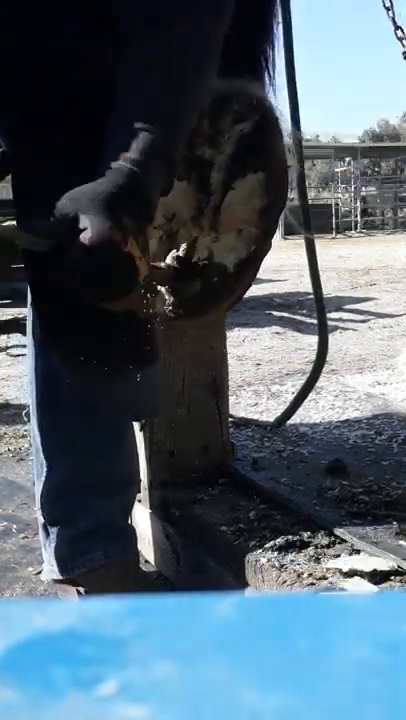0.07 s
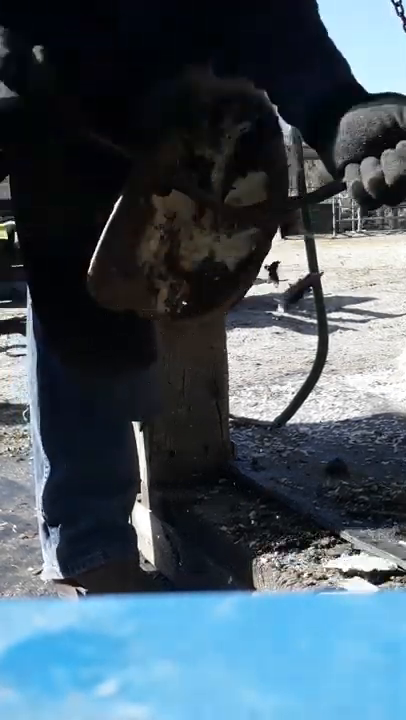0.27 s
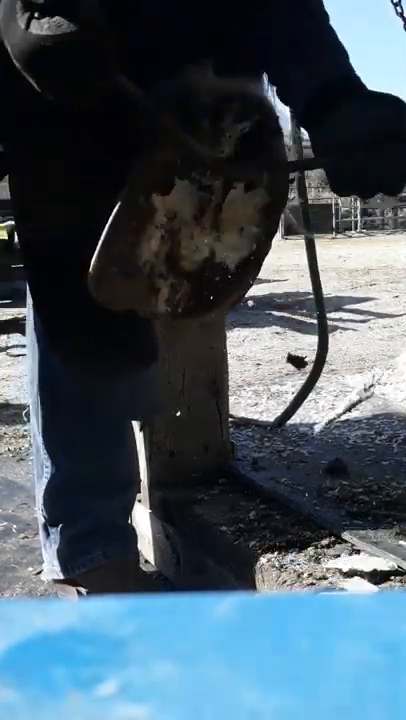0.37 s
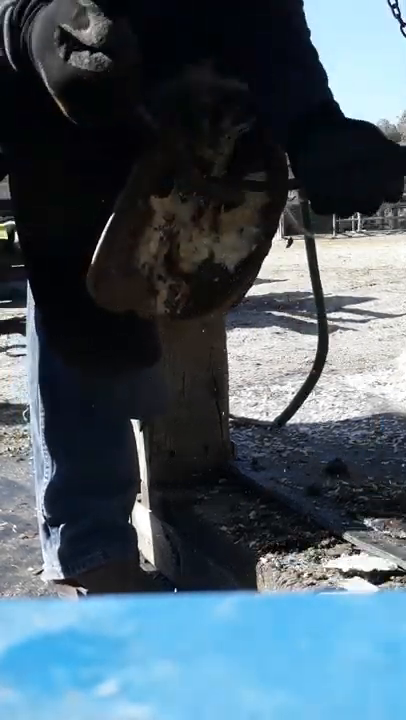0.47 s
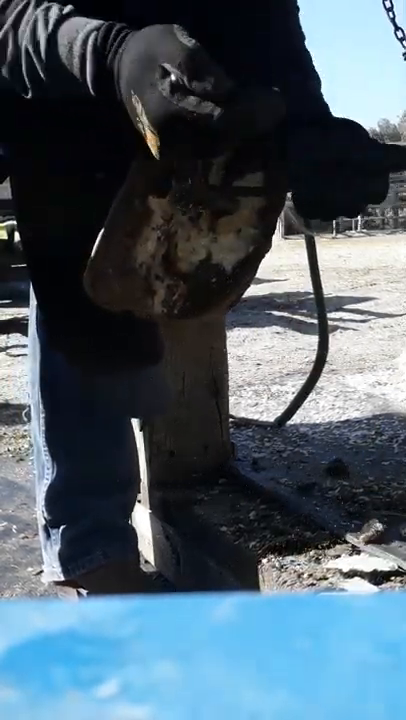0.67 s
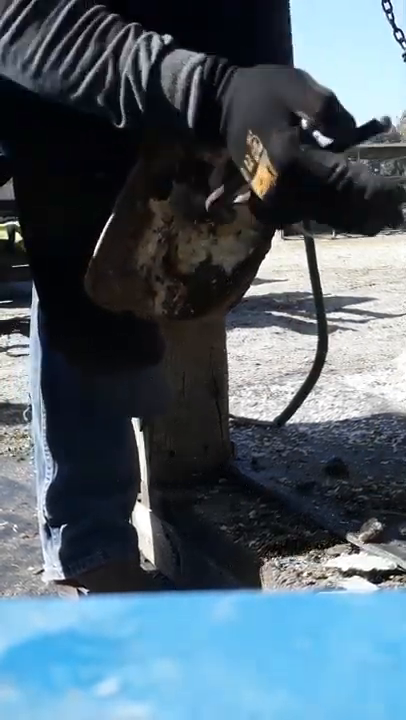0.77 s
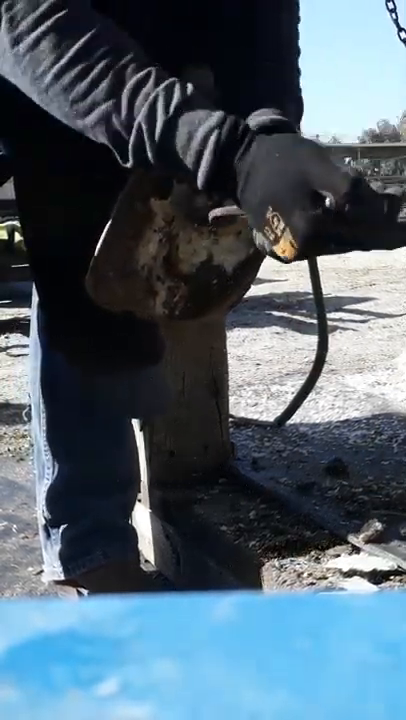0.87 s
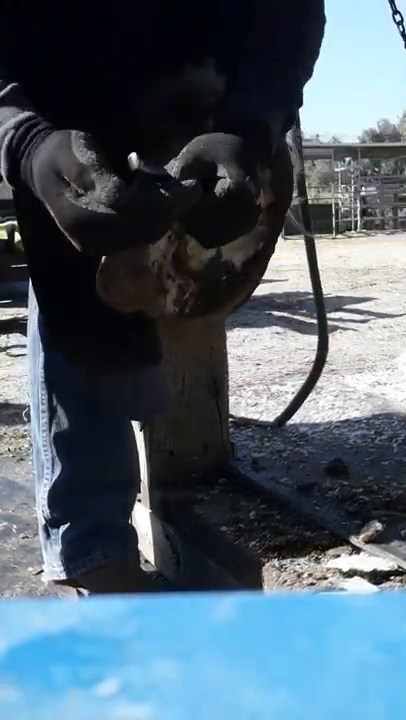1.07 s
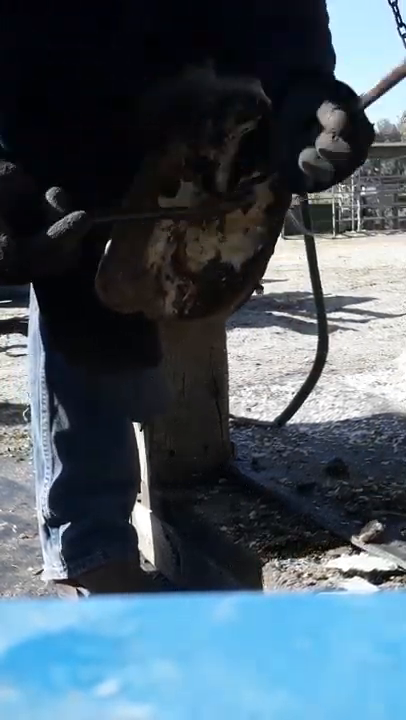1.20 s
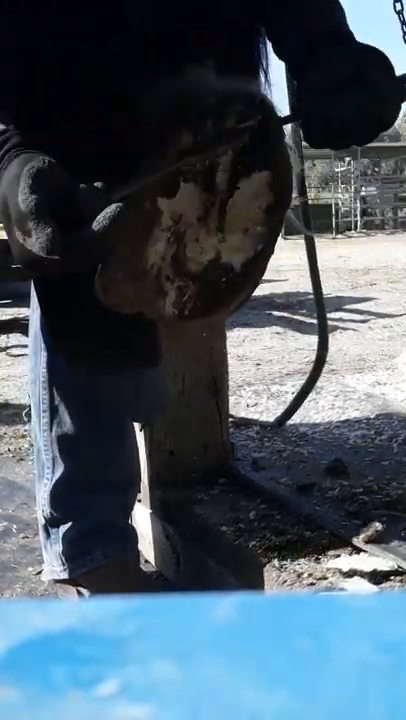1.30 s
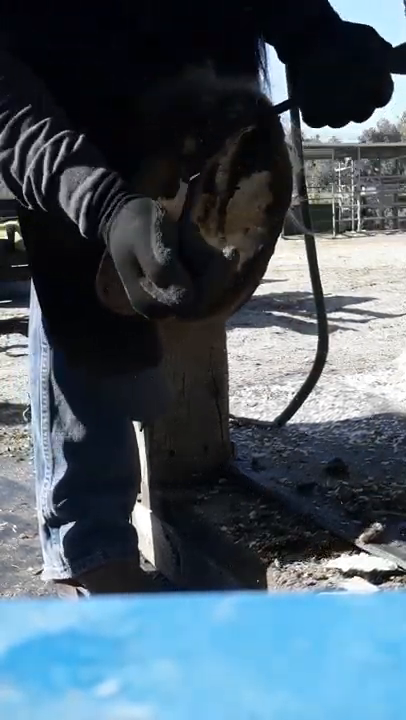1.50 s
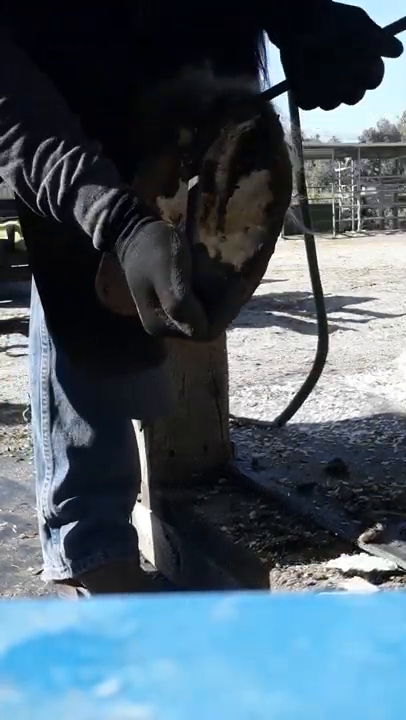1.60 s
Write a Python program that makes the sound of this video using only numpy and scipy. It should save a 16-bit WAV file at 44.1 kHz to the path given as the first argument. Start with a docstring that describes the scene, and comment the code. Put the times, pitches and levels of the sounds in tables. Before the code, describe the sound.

Hoof trimming outdoors: short scrapes, a crisp crack, a high steel squeak and a clack.

```python
"""A farrier's steel tool scrapes a raised hoof, cracks through the horn, knocks and clacks.
Scrapes, cracks, thuds and the clack are streams of tiny contacts filtered by horn, hoof or steel.
The slipping steel squeals briefly and gives one loud stick-slip squeak. A small bit of metal
tinks twice. The walls of an open yard answer briefly over a low outdoor rumble."""
import sys
import numpy as np
from scipy import signal
from scipy.fft import rfft, irfft, next_fast_len
from scipy.io import wavfile
from scipy.ndimage import map_coordinates

SR = 44100
rng = np.random.default_rng(int(sys.argv[2]) if len(sys.argv) > 2 else 0)


def file_out(sig):
    """Save sig as 16-bit WAV at sys.argv[1]."""
    # one column per channel
    cols = np.atleast_2d(sig).T
    # limit, then scale
    lim = np.clip(cols, -1, 1)
    pcm = np.round(lim * 32767).astype(np.int16)
    wavfile.write(sys.argv[1], SR, pcm)


N = 72765

# Rumble spectrum. Each row: frequency in Hz, relative level in dB.
RUMBLE_SPECTRUM = [(25, -40.5), (45, -40.5), (62, -3), (80, 3), (150, 0.5), (280, -2.5), (340, -8),
                   (620, -8), (1050, -9), (1800, -23.5), (4500, -31), (6500, -25), (8800, -46.5),
                   (15500, -36.5)]
# Rumble stereo image. Each row: frequency in Hz, left-right correlation.
RUMBLE_CORRELATION = [(60, 1), (130, 0.95), (290, 0.86), (640, 0.78), (1400, 0.022), (15000, 0.02)]
# Narrow bands in the rumble. Each row: centre in Hz, width in Hz, level in dB.
DRONE_BANDS = [(82.6, 5.7, -61.5), (146.4, 6.1, -59), (266.7, 15, -64.5), (951, 40, -67.5)]
# Contact stereo image. Each row: frequency in Hz, left-right correlation.
CONTACT_CORRELATION = [(200, 1), (700, 0.85), (2000, 0.054), (12000, 0.058)]
# Steel over horn. Each row: start in seconds, length in seconds, level in dB,
# level change over the stroke in dB, treble shelf in dB.
STROKES = [(0.083, 0.05, -63.5, 6, -2), (0.148, 0.027, -39, 1, -3), (0.176, 0.0083, -39.5, 2, -25),
           (0.199, 0.043, -29.5, -7, 9.5), (0.494, 0.04, -33.5, -13.5, -24.5),
           (0.604, 0.093, -55.5, -5, -10.5), (0.8, 0.043, -45.5, -6, -11), (0.955, 0.06, -52.5, -3.5, -13),
           (1.151, 0.077, -37.5, -4, -6.5), (1.402, 0.019, -43, -2, -14)]
# Scraped horn. Each row: frequency in Hz, relative level in dB.
SCRAPE_SPECTRUM = [(200, -11), (1100, -7.5), (1650, -10), (2200, -5), (2800, -9), (3450, -2.5),
                   (4300, -3.5), (5600, 0), (7300, 1.5), (8200, -16.5), (9200, -19.5), (10000, -12),
                   (10900, -28), (12100, -7), (13300, -22.5), (14400, -15), (16000, -28)]
# Decay off near walls. Each row: frequency in Hz, T60 in seconds.
NEAR_WALL_T60 = [(200, 0.17), (3500, 0.21), (5500, 0.17), (13000, 0.14)]
# Tool modes sounded by slips. Each row: start in seconds, length in seconds, pitch in Hz,
# glide in Hz, level in dB, left over right in dB.
SLIPS = [(0.134, 0.037, 1170, -130, -44.5, -3.5), (0.142, 0.025, 3400, -5.5, -41.5, 8),
         (0.199, 0.03, 3440, 29.5, -33, 7), (0.2, 0.018, 12300, 3, -38, 26),
         (0.784, 0.025, 11700, 243.5, -35.5, 2), (0.78, 0.024, 12640, 86.5, -15, 14.5),
         (0.8, 0.034, 12600, 450.5, -27, 12), (0.79, 0.031, 7030, 89, -30, -7.5),
         (0.799, 0.032, 5470, 100, -28, -11), (0.83, 0.023, 14770, -2.5, -35, 5),
         (0.952, 0.056, 4450, -220, -54, -3), (0.956, 0.062, 5650, -450, -55, 0),
         (1.16, 0.09, 2360, -260, -48.5, 0.5), (1.14, 0.075, 3800, -200, -41.5, 7.5),
         (1.136, 0.1, 4900, -100, -45, -4.5)]
# Hoof bumps on its stand. Each row: start in seconds, level in dB, hold in seconds,
# T60 in seconds, centre of the push in Hz.
HOOF_BUMPS = [(0.238, -42.5, 0.0058, 0.052, 110), (0.365, -37, 0.011, 0.094, 192),
              (0.407, -57, 0.16, 0.15, 97), (0.494, -45.5, 0.037, 0.1, 150),
              (1.2878, -43, 0.0087, 0.026, 860), (1.397, -51, 0.004, 0.035, 700)]
# Damped modes of hoof on stand. Each row: centre in Hz, width in Hz, relative level in dB.
HOOF_MODES = [(94.8, 52, -4.5), (281, 40, 3), (580, 150, 1.5), (1148, 540, -3)]
# Horn fractures, plus the broad crack of steel meeting steel at 1.289 s. Each row: start in seconds, level in
# dB, hold in seconds, T60 in seconds.
CRACKS = [(0.2385, -9.5, 0.0042, 0.045), (0.249, -16.5, 0.0078, 0.06), (0.372, -38.5, 0.0014, 0.02),
          (0.501, -30, 0.0031, 0.03), (0.53, -44, 0.0027, 0.02), (1.289, -26.5, 0.002, 0.03),
          (1.4, -35.5, 0.002, 0.019)]
# Cracking horn, also the broad crack of the clack. Each row: frequency in Hz, relative level in dB.
CRACK_SPECTRUM = [(150, -48), (550, -15.5), (900, -17.5), (1600, -20), (2100, -3.5), (2650, -9.5),
                  (3300, -8.5), (3900, -5.5), (4400, -9), (5450, 0), (6200, -4.5), (6700, -5.5),
                  (7250, -0.5), (7900, -17.5), (9000, -24), (9900, -14), (10900, -25.5), (12000, -15.5),
                  (13300, -21), (15500, -21)]
# Jogs of the small metal bit. Each row: start in seconds, level in dB.
TINK_HITS = [(0.329, -39.5), (1.602, -54.5)]
# Modes of that bit. Each row: frequency in Hz, relative level in dB, T60 in seconds.
BIT_MODES = [(15020, -0.5, 0.3), (15490, -5.5, 0.14)]
# Main squeak tone. Each row: time in seconds, pitch in Hz, level in dB.
SQUEAK_TRACK = [(0.714, 5270, -66), (0.724, 5260, -39), (0.732, 5205, -34), (0.739, 5200, -20.5),
                (0.746, 5235, -18.5), (0.753, 5255, -22.5), (0.769, 5255, -19), (0.775, 5230, -30),
                (0.78, 5295, -16.5), (0.789, 5280, -19), (0.796, 5255, -26), (0.816, 5275, -30),
                (0.826, 5275, -55)]
# Squeak harmonics. Each row: multiple of the pitch, initial level in dB re the main tone.
SQUEAK_HARMONICS = [(2, -11.5), (3, -16.5)]
# Rasp with the squeak. Each row: frequency in Hz, relative level in dB.
RASP_SPECTRUM = [(700, -2.5), (2300, -1), (4000, -6.5), (5700, 11), (7500, -2.5), (9000, -12.5),
                 (11500, -3), (15500, -2.5)]
# Steel on steel. Each row: start in seconds, level in dB, hold in seconds, T60 in seconds.
STEEL_HITS = [(1.2881, -16.5, 0.005, 0.013)]
# Modes of the struck tool. Each row: centre in Hz, width in Hz, relative level in dB.
TOOL_MODES = [(2200, 140, -15.5), (2980, 100, -6.5), (4635, 120, 5), (5520, 140, -0.5), (6250, 130, 4.5),
              (7460, 110, -5), (6850, 130, -0.5)]

FRICTION_TICKS_PER_S, BURST_TICKS_PER_S = 7000, 9000
JITTER_KNOTS_PER_S = 1100
TIME_S = np.arange(N) / SR


def amp(db):
    return 10 ** (np.asarray(db) / 20)


def unit_rms(x):
    return x / np.sqrt(np.mean(x ** 2) + 1e-20)


def ramp(start_s, length_s):
    return np.clip((TIME_S - start_s) / length_s, 0, 1)


def log_interp(points, hz):
    knots_hz, values = np.transpose(points)
    return np.interp(np.log(hz + 1), np.log(knots_hz + 1), values)


def wobble(knots_per_s):
    """Smooth random curve."""
    return map_coordinates(rng.standard_normal(N // 8), [TIME_S * knots_per_s], mode="wrap")


def filtered(x, response):
    """Apply the complex gain response(hz)."""
    size = next_fast_len(N + SR // 2)
    return irfft(rfft(x, size) * response(np.fft.rfftfreq(size, 1 / SR)), size)[..., :N]


def resonances(modes, hz):
    """Modal response; neighbours swing in opposite senses."""
    return sum((-1) ** k * amp(db) * 1j * hz * width / (centre ** 2 - hz ** 2 + 1j * hz * width)
               for k, (centre, width, db) in enumerate(modes))


def pan(left_db):
    """Constant-power stereo gains."""
    return unit_rms(amp([[left_db / 2], [-left_db / 2]]))


def spread(pair, correlation):
    """Mix two independent signals to a given left-right correlation."""
    angle = lambda hz: np.arccos(np.clip(log_interp(correlation, hz), -1, 1)) / 2
    mid, side = filtered(pair, lambda hz: np.array([np.cos(angle(hz)), np.sin(angle(hz))]))
    return np.array([mid + side, mid - side])


def from_left(x, lag_s=0.0003406):
    """The left channel leads by lag_s."""
    return filtered(x, lambda hz: np.exp(1j * np.pi * hz * lag_s * np.array([[1], [-1]])))


def ticks(per_s, spread_db=4.5):
    """Tiny random contacts of uneven size."""
    hits = rng.random((2, N)) < per_s / SR
    signs = np.sign(rng.standard_normal((2, N)))
    sizes = amp(spread_db * rng.standard_normal((2, N)))
    return spread(hits * signs * sizes, CONTACT_CORRELATION)


def friction(response):
    """Steady ticks ringing through a body, RMS 1."""
    return unit_rms(filtered(ticks(FRICTION_TICKS_PER_S), response))


def burst(row, rise_s, response):
    """One contact: ticks rise, hold and decay while the body rings on."""
    start_s, db, hold_s, t60_s = row
    drive = ticks(BURST_TICKS_PER_S)
    decay_db = 60 * np.maximum(TIME_S - start_s - hold_s, 0) / t60_s
    force = ramp(start_s, min(rise_s, hold_s)) * amp(db - decay_db)
    return filtered(force * drive, response) / filtered(drive, response).std()


def slip_phase(hz, jitter_hz):
    """Phase of an unsteady stick-slip tone."""
    return 2 * np.pi * np.cumsum(hz + jitter_hz * wobble(JITTER_KNOTS_PER_S)) / SR


def slip_envelope(start_s, length_s, roughness=0.3):
    """Rough swell and fade of one slip."""
    return np.sin(np.pi * ramp(start_s, length_s)) ** 2 * (1 + roughness * wobble(JITTER_KNOTS_PER_S))


def rumble(level_db=-51, swell_db=1.5):
    """Low outdoor noise, wavering slightly, with narrow drones."""
    def noise(response):
        return unit_rms(filtered(spread(rng.standard_normal((2, N)), RUMBLE_CORRELATION), response))

    gain = amp(level_db + swell_db * wobble(knots_per_s=7.76))
    out = gain * noise(lambda hz: amp(log_interp(RUMBLE_SPECTRUM, hz)))
    for centre_hz, width_hz, db in DRONE_BANDS:
        out += amp(db) * noise(lambda hz: np.exp(-((hz - centre_hz) / width_hz) ** 2))
    return out


def scrapes(fall_s=0.012, chatter_db=2.2, ripple_db=2.5, ripple_step_hz=220, shelf_hz=8450):
    """The edge chatters over horn; each stroke meets a spot with its own resonances."""
    out = np.zeros((2, N))
    for start_s, length_s, db, change_db, treble_db in STROKES:
        spot = rng.standard_normal(N // 8)
        rise = ramp(start_s, 0.25 * length_s)
        fall = np.exp(-np.maximum(TIME_S - start_s - length_s, 0) / fall_s)
        level_db = db + change_db * ramp(start_s, length_s) + chatter_db * wobble(knots_per_s=360)

        def horn(hz):
            spot_db = ripple_db * map_coordinates(spot, [hz / ripple_step_hz])
            shelf_db = treble_db * (1 - 1 / (1 + (hz / shelf_hz) ** 4))
            return amp(log_interp(SCRAPE_SPECTRUM, hz) + spot_db + shelf_db)

        out += rise * fall * amp(level_db) * friction(horn)
    return out


def yard_echo(x, delay_s=0.011, far_db=-36.5, far_t60_s=0.26):
    """Near walls answer briefly, far ones faintly and longer."""
    band_hz, age_s, noise = signal.stft(rng.standard_normal((2, SR // 2)), SR, nperseg=256)
    near = amp(-60 * age_s / log_interp(NEAR_WALL_T60, band_hz)[:, None])
    far = amp(far_db - 60 * age_s / far_t60_s)
    tail = signal.istft(noise * (near + far), SR, nperseg=256)[1]
    tail /= np.linalg.norm(tail, axis=1, keepdims=True)
    wet = signal.fftconvolve(x, tail, axes=1)[:, :N]
    return pan(left_db=-4.5) * filtered(wet, lambda hz: np.exp(-2j * np.pi * hz * delay_s))


def squeals(jitter_hz_per_s=1500):
    """Slipping steel catches mode after mode; short slips sing, long ones scatter in pitch."""
    out = np.zeros((2, N))
    for start_s, length_s, pitch_hz, glide_hz, db, left_db in SLIPS:
        phase = slip_phase(pitch_hz + glide_hz * ramp(start_s, length_s), jitter_hz_per_s * length_s)
        out += pan(left_db) * amp(db) * np.sqrt(2) * slip_envelope(start_s, length_s) * np.sin(phase)
    return out


def thuds(rise_s=0.0033):
    """Soft pushes sound the hoof's low modes, hard ones its higher modes."""
    push = lambda ratio: (1j * ratio / (1 + 1j * ratio) ** 2) ** 2
    return sum(burst(row, rise_s, lambda hz: resonances(HOOF_MODES, hz) * push(hz / centre_hz))
               for *row, centre_hz in HOOF_BUMPS)


def cracks(rise_s=0.0036):
    """The edge breaks through horn; the same broad crack also sounds when steel meets steel."""
    return sum(burst(row, rise_s, lambda hz: amp(log_interp(CRACK_SPECTRUM, hz))) for row in CRACKS)


def tinks(rise_s=0.003):
    """A jogged bit of metal rings on two close, very high modes."""
    out = np.zeros(N)
    for start_s, hit_db in TINK_HITS:
        age_s = np.maximum(TIME_S - start_s, 0)
        ring = sum(amp(hit_db + db - 60 * age_s / t60_s) * np.sin(2 * np.pi * hz * age_s)
                   for hz, db, t60_s in BIT_MODES)
        out += (1 - np.exp(-age_s / rise_s)) * ring
    return pan(left_db=7.5) * out


def squeak(jitter_hz=24, harmonic_fade_db=23.5, second_hz=2995, second_db=-24, sum_db=-7, rasp_db=-28):
    """Dry steel sings on one mode; midway a second joins, with sum and difference tones."""
    knots_s, pitch_hz, db = np.transpose(SQUEAK_TRACK)
    phase = slip_phase(np.interp(TIME_S, knots_s, pitch_hz), jitter_hz)
    second_phase = slip_phase(second_hz, jitter_hz)
    harmonics = sum(amp(level_db) * np.sin(k * phase) for k, level_db in SQUEAK_HARMONICS)
    fade = amp(-harmonic_fade_db * ramp(knots_s[0], knots_s[-1] - knots_s[0]))
    roughness = 1 + 0.35 * wobble(JITTER_KNOTS_PER_S)
    tone = np.sin(phase) + fade * roughness * harmonics
    sum_tones = np.sin(phase + second_phase) + np.sin(2 * phase + second_phase)
    second = np.sin(second_phase) + np.sin(phase - second_phase) + amp(sum_db) * sum_tones
    tone += amp(second_db) * slip_envelope(start_s=0.746, length_s=0.06) * second
    rasp = amp(rasp_db) * friction(lambda hz: amp(log_interp(RASP_SPECTRUM, hz)))
    envelope = amp(np.interp(TIME_S, knots_s, db, left=-120, right=-120))
    return pan(left_db=8) * envelope * (np.sqrt(2) * tone + rasp)


def clack(rise_s=0.000502):
    """Steel meets steel and chatters through the tool's modes."""
    return sum(burst(row, rise_s, lambda hz: resonances(TOOL_MODES, hz)) for row in STEEL_HITS)


def scene(echo_db=-11, slip_echo_db=-7):
    """Tool and hoof, slightly left, with wall echo, tinks and rumble."""
    cutting = scrapes() + cracks() + clack()
    slipping = squeak() + squeals()
    hoof = thuds()
    direct = from_left(pan(left_db=1.5) * cutting + slipping + hoof)
    to_walls = amp(echo_db) * (cutting + hoof) + amp(slip_echo_db) * slipping.mean(axis=0)
    return direct + yard_echo(to_walls) + tinks() + rumble()


def record(dry, ceiling=0.95, cutoff_hz=15900):
    """Soft clip, then brick-wall low-pass."""
    rounded = dry / (1 + (dry / ceiling) ** 6) ** (1 / 6)
    return filtered(rounded, lambda hz: hz < cutoff_hz)


dry = scene()
out = record(dry)
file_out(out)
```